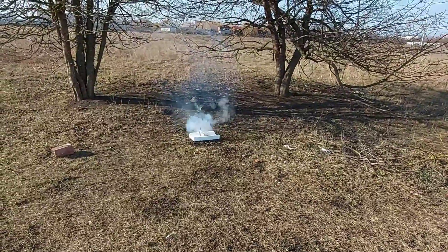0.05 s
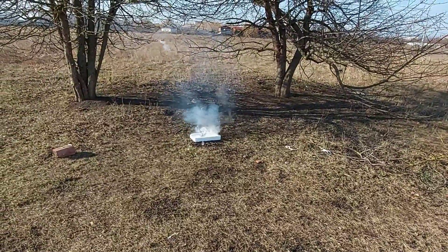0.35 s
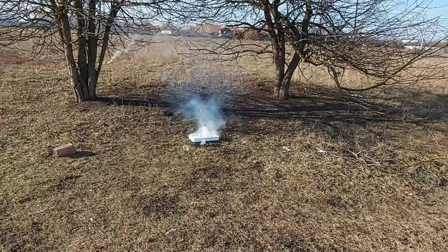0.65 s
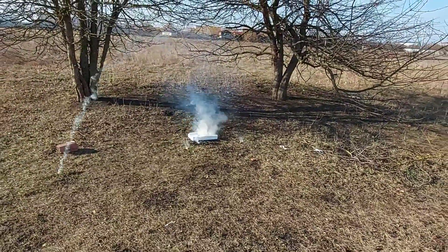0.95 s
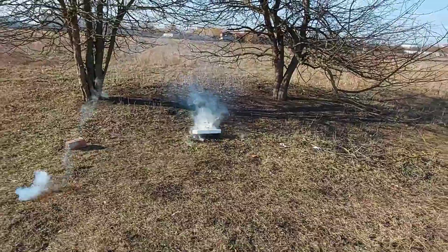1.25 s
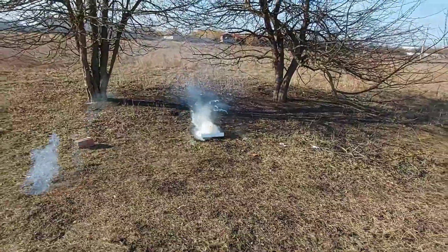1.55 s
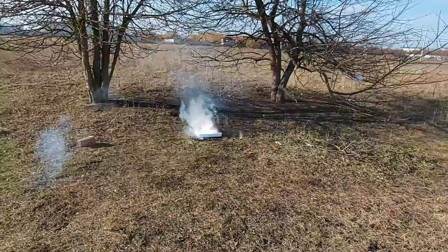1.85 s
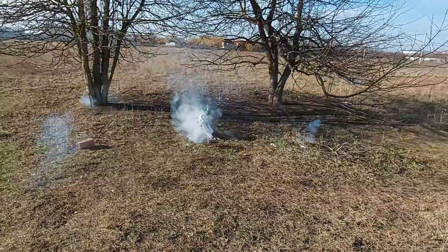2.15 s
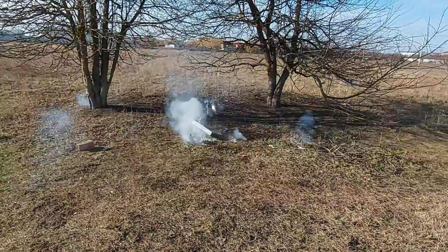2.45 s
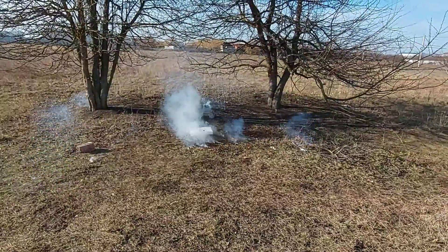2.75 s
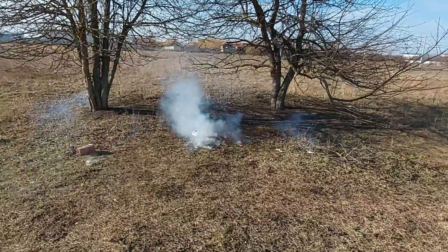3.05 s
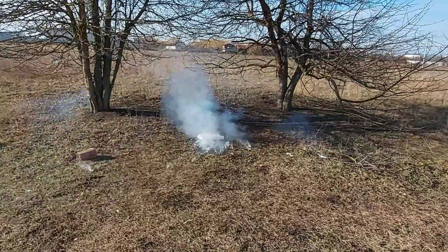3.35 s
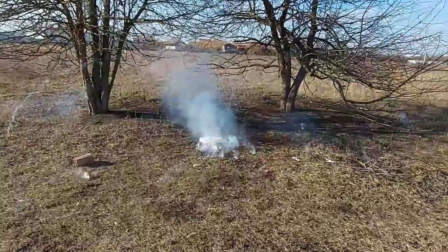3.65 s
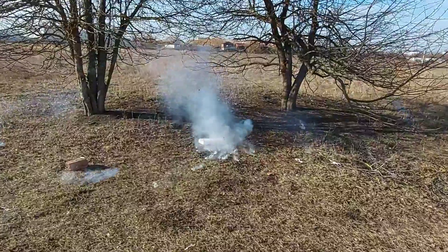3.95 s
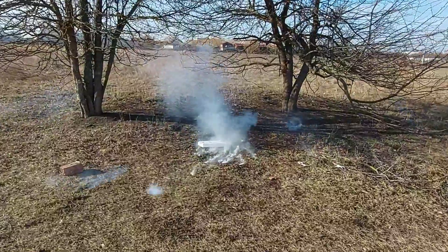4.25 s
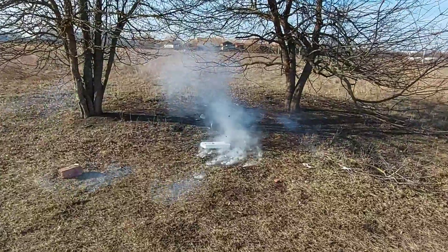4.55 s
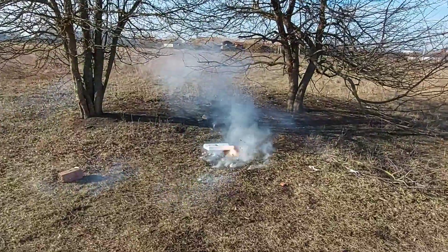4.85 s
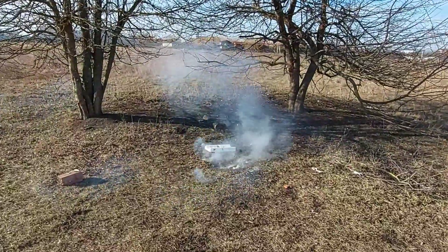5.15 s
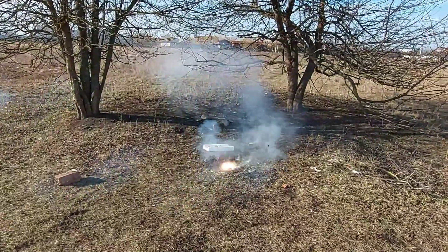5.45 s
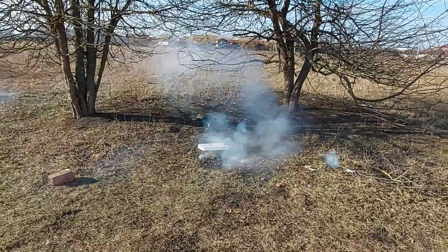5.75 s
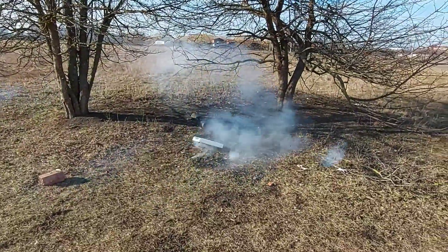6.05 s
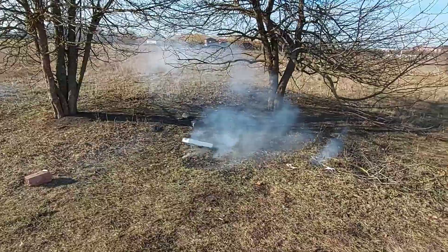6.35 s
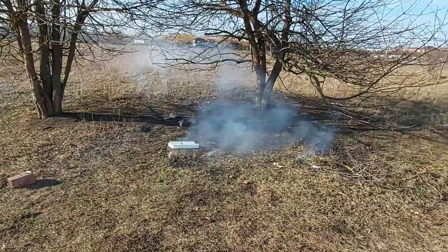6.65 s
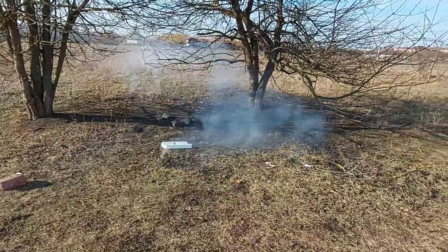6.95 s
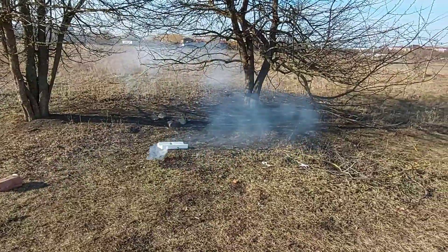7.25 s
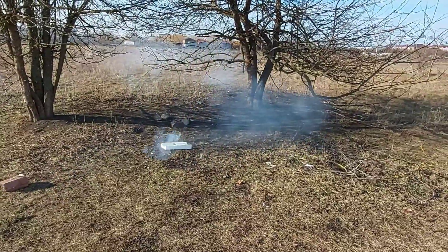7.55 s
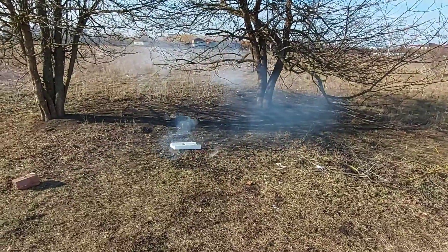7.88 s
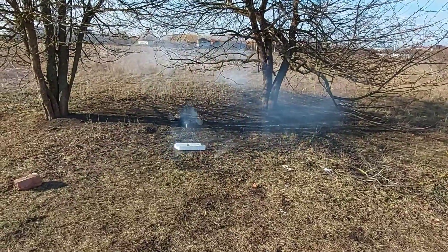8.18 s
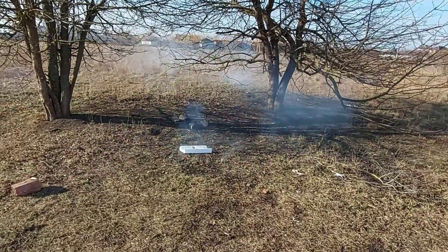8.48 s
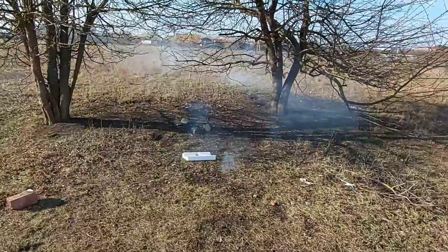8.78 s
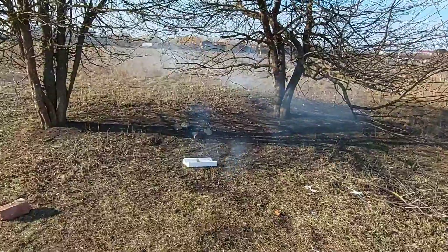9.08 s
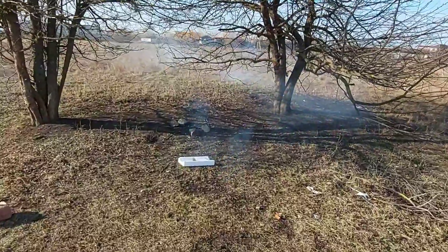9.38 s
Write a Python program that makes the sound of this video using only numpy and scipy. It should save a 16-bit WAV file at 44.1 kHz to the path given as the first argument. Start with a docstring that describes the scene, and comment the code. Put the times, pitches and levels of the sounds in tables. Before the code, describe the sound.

A bundle of firecrackers explodes outdoors in rapid, uneven cracks with faint echoes, ending with two single bangs over light wind.

```python
"""An open field: firecrackers go off a few metres away, one bang, ragged strings, then two late ones.
Each blast sprays back from grass and branches; distant trees and houses answer faintly.
Powder spits and fuses crackle over light wind; a faint drone swells far off near the end.
A limiter crushes each blast and recovers while the spray is still dying, so a bang has two humps."""
import sys
import numpy as np
from scipy import signal
from scipy.fft import rfft, irfft, next_fast_len
from scipy.io import wavfile
from scipy.ndimage import uniform_filter1d, minimum_filter1d, map_coordinates

SR = 44100
rng = np.random.default_rng(int(sys.argv[2]) if len(sys.argv) > 2 else 0)


def materialize(psi):
    """Save the field psi as 16-bit PCM at rate SR to the path in sys.argv[1].

    A 1-D psi becomes a single channel; in a 2-D psi each row is a channel.
    """
    bounded = np.clip(np.atleast_2d(psi).T, -1, 1)
    quanta = np.round(bounded * 32767).astype(np.int16)
    wavfile.write(sys.argv[1], SR, quanta)


N = 415422

# Wind puffs. Each row: peak time in seconds, half length in seconds, rumble rise in dB.
WIND_PUFFS = [(.1, 0.28, 7.5), (1.152, .2, 5), (7.62, 0.47, 6.5), (8.666, 0.29, 14), (9.357, 0.28, 6)]
# Noise spectra. Each row: frequency in Hz, relative density in dB.
RUMBLE_SPECTRUM = [(20, -23), (45, -2.5), (70, 7.5), (105, -11.5), (140, -1), (200, -19.5), (280, -18.5),
                   (450, -30.5), (900, -72.5)]
HUSH_SPECTRUM = [(100, -27.5), (280, 3), (420, -6.5), (540, -6), (750, -9), (1500, -15.5), (3000, -23),
                 (6000, -27.5), (15000, -33.5)]
GRASS_SPECTRUM = [(2500, -20), (4400, 1), (7000, -10), (15000, -18)]
DRONE_SPECTRUM = [(250, -23.5), (460, -5.5), (540, 3.5), (630, -12.5), (1100, -8.5), (1700, -20.5),
                  (4000, -43.5)]
LAND_SPECTRUM = [(60, -5.5), (200, -5), (450, -3.5), (900, -18), (1800, -4.5), (3000, -16.5), (4500, -4),
                 (7000, -11.5), (15000, -21)]
SPIT_SPECTRUM = [(200, 4), (1800, 0), (7000, -9), (15000, -15)]
FUSE_SPECTRUM = [(1000, -19), (4500, 1), (15000, -4.5)]
FLARE_SPECTRUM = [(300, -2), (1500, -10), (7000, -21.5), (15000, -33.5)]
SPRAY_SPECTRUM = [(30, -18), (70, -9), (200, -11.5), (350, -6.5), (700, -1.5), (1000, -5), (1400, -3.5),
                  (2800, -8), (4800, -11.5), (7000, -16.5), (15000, -25)]
BLAST_SPECTRUM = [(30, -24), (120, -9.5), (350, 5.5), (700, -1.5), (1400, -1), (2800, -8.5), (4800, -13),
                  (7000, -19), (15000, -24)]
# The land's diffuse answer to a bang. Each row: delay in seconds, relative level in dB.
LAND_DECAY = [(.03, -4.5), (.07, -6), (.12, -3), (.25, -13.5), (.38, -14.5), (.55, -13), (.9, -25)]
# Far trees and houses. Each row: delay in seconds, relative level in dB, T60 in seconds, centre in Hz.
REFLECTORS = [(0.094, 1.5, 0.011, 2650), (0.1219, 2, 0.24, 2064), (.197, -1, 0.16, 1910),
              (.29, -12, 0.33, 1800), (.425, -9, 0.85, 649)]
# Echo colour. Each row: multiple of the centre frequency, relative density in dB.
ECHO_BAND = [(.2, -14), (.45, -8), (.7, 0), (1, -1), (2.1, -8), (3.4, -17), (7, -27), (20, -55)]
# Spits and falling scraps. Each row: start in seconds, relative level in dB.
SPIT_EVENTS = [(0.388, -40), (1.0084, -58), (1.1394, -58), (2.537, -25), (3.3368, -34), (4.0124, -41),
               (6.6392, -42), (8.6419, -39.5)]
# Firecrackers. Each row: start in seconds, relative power in dB, thump in dB, midrange scoop in dB.
CRACKERS = [(0.0469, 7.5, -14.5, 9.5), (1.3032, 0, -3, 0), (1.343, 5, -1, 5), (1.6493, -7.5, 1.5, 2),
            (1.6919, 1, -9, 6.5), (1.9385, -2, 1.5, 2), (1.9765, 0, -5.5, 3), (2.0212, -1.5, -3, 4),
            (2.0906, -1.5, 2, 5.5), (2.1064, -0.5, -10, -5.5), (2.1251, 0.5, 5.5, 2), (2.1419, -2.5, -7, 0),
            (2.155, 2, -1.5, 6), (2.2018, 3, -8.5, 1), (2.2886, -4, -1.5, -1.5), (2.393, -1, 6.5, 0.5),
            (2.5659, 2.5, -0.5, 6), (2.584, -12.5, 2.5, 0), (2.609, -1.5, 2.5, 1), (2.6305, 1, 2, 1.5),
            (2.7369, 3, 3.5, 0), (2.9097, 0, 1.5, 0), (2.9597, 5.5, -4, 1), (3.0809, -19.5, -2.5, 4.5),
            (3.2103, 1, -5.5, 2.5), (3.246, 3.5, 2.5, 4.5), (3.6697, -7.5, 3, 5), (3.7363, 2.5, -2, -4),
            (3.7535, -4, -2, 0), (3.7865, 0.5, -9, -1), (3.8289, 2.5, 1, 0), (3.839, -3, -15, -2.5),
            (3.8734, -2.5, 0.5, 5), (3.9461, -7.5, 3.5, 3.5), (4.1245, -5, 0.5, -1), (4.344, -1.5, 4.5, 3),
            (4.408, -1.5, -0.5, 1), (4.6369, -1, 2, 1), (4.6661, -6.5, -6.5, -1), (4.7854, -1, 6, -3.5),
            (4.8163, -2.5, 4.5, -3), (4.8545, -1, -1, 0), (4.9605, -3.5, 0, 2), (5.0048, -4, -1.5, -0.5),
            (5.108, -2, 5, 0.5), (5.134, -3, -13, -2.5), (5.1635, -3, -3.5, -1.5), (5.1928, -4, 1, -2),
            (5.2055, 0, -3, 1), (5.363, 1.5, -3.5, -0.5), (5.3901, -2, 4.5, 3), (5.5557, -1.5, 1.5, -3.5),
            (5.5997, 1.5, -9, 1), (5.6221, -3, -5.5, -3), (5.666, -0.5, -10, -2),
            (5.7024, -11.5, 12.5, 1.5), (5.749, 3, 5, 3), (6.0995, -4, 1.5, 0.5), (6.1567, -3, -6, -3.5),
            (6.3337, 1, 2, -2.5), (7.3005, 0.5, -3, 6), (8.7788, 1, 4.5, -2.5)]
# Stereo likeness of noise. Each row: frequency in Hz, left-right correlation.
STEREO_LIKENESS = [(60, 0.62), (250, .8), (600, 0.58), (1200, 0.078), (3000, 0.07), (10000, 0)]
# Microphone response with its port notch. Each row: frequency in Hz, gain in dB.
MIC_RESPONSE = [(7600, 1), (8500, -8), (9500, -10.5), (10500, -3.5), (11800, 1.5), (15200, 1),
                (16000, -11.5), (16600, -34)]


def amp(db):
    """Decibels to gain."""
    return 10 ** (np.asarray(db) / 20)


def unit(x):
    """x at rms 1."""
    return x / np.sqrt(np.mean(x ** 2) + 1e-20)


def along(points, hz):
    """(Hz, value) points read on a log axis."""
    knot_hz, values = np.transpose(points)
    return np.interp(np.log(hz + 1), np.log(knot_hz + 1), values)


def filtered(x, response):
    """x through a frequency response."""
    size = x.shape[-1]
    padded = next_fast_len(size + SR // 10)
    return irfft(rfft(x, padded) * response(np.fft.rfftfreq(padded, 1 / SR)), padded)[..., :size]


def split(x, edge_hz):
    """Low and high bands of x."""
    low = filtered(x, lambda hz: 1 / (1 + (hz / edge_hz) ** 4))
    return low, x - low


def causal(gain_db):
    """Minimum-phase response: no ringing ahead of a blow."""
    cepstrum = irfft(np.log(amp(gain_db)))
    half = cepstrum.shape[-1] // 2
    cepstrum[..., 1:half] *= 2
    cepstrum[..., half + 1:] = 0
    return np.exp(rfft(cepstrum))


def noise(spectrum, size):
    """Stereo noise of rms 1, alike in the bass, unrelated in the treble."""
    def colour(hz):
        angle = np.arccos(np.clip(along(STEREO_LIKENESS, hz), -1, 1)) / 2
        return amp(along(spectrum, hz)) * np.array([np.cos(angle), np.sin(angle)])
    mid, side = filtered(rng.standard_normal((2, size)), colour)
    return unit(np.array([mid + side, mid - side]))


def wobble(rate_hz, size):
    """Smooth random curve, rate_hz knots a second."""
    knots = rng.standard_normal(int(size * rate_hz / SR) + 4)
    return map_coordinates(knots, [np.arange(size) * rate_hz / SR])


def patchy(x, depth_db):
    """x under random gain over time and frequency."""
    bins = signal.stft(x, nperseg=512)[2]
    field = uniform_filter1d(rng.standard_normal(bins.shape[1:]), size=4, axis=0)
    field = uniform_filter1d(field, size=7, axis=1)
    return signal.istft(bins * amp(depth_db * unit(field)), nperseg=512)[1][:, :N]


def add(track, start_s, sound):
    """Mix a sound into the track."""
    start = round(start_s * SR)
    first, last = max(start, 0), min(start + sound.shape[-1], N)
    track[..., first:last] += sound[..., first - start:last - start]


def breeze(rumble_db=-66, hush_db=-69.5, grass_db=-90):
    """Wind puffs rumble on the microphone, lift the hush of open country and stir dry grass."""
    t = np.arange(N) / SR
    gust_db = sum(db * np.exp(-((t - peak_s) / half_s) ** 2) for peak_s, half_s, db in WIND_PUFFS)
    rumble = amp(rumble_db + gust_db + 2.8 * wobble(9, N)) * noise(RUMBLE_SPECTRUM, N)
    hush = amp(hush_db + .23 * gust_db + .48 * wobble(2.2, N)) * noise(HUSH_SPECTRUM, N)
    grass = amp(grass_db + .37 * gust_db + 3 * wobble(7, N)) * noise(GRASS_SPECTRUM, N)
    return rumble + patchy(hush, depth_db=2.5) + grass


def drone(level_db=-72, peak_s=8.45, half_s=.4, waver_db=2):
    """A dull, wavering drone swells and fades far across the fields."""
    swell = np.exp(-((np.arange(N) / SR - peak_s) / half_s) ** 2)
    waver = amp(level_db + waver_db * wobble(6, N))
    return swell * waver * patchy(noise(DRONE_SPECTRUM, N), depth_db=2.5)


def far_echoes(land_db=-51, echo_db=-47, dull_hz=1300, dull_t60_s=1.3, flutter_db=2.4):
    """Land, trees and houses return every bang; long paths come back duller and softer."""
    t = np.arange(SR) / SR
    bang_power = np.zeros(N)
    for start_s, power_db, *_ in CRACKERS:
        add(bang_power, start_s, amp([power_db]) ** 2)

    def after_bangs(envelope):  # echoes add in power
        return np.sqrt(np.abs(signal.fftconvolve(bang_power, envelope ** 2)[:N]))

    low_decay = amp(np.interp(t, *np.transpose(LAND_DECAY))) * (t > LAND_DECAY[0][0])
    high_decay = low_decay * amp(1.5 - 60 * t / dull_t60_s)
    low, high = split(noise(LAND_SPECTRUM, N), dull_hz)
    out = amp(land_db) * (low * after_bangs(low_decay) + high * after_bangs(high_decay))
    for delay_s, db, t60_s, centre_hz in REFLECTORS:
        spectrum = [(multiple * centre_hz, band_db) for multiple, band_db in ECHO_BAND]
        age_s = np.maximum(t - delay_s, 0)
        envelope = (1 - np.exp(-age_s / (.026 * t60_s))) * amp(-60 * age_s / t60_s)
        out += amp(echo_db + db) * noise(spectrum, N) * after_bangs(envelope)
    return patchy(out * amp(flutter_db * wobble(130, N)), depth_db=2)


def spits(gain_db=-7, t60_s=.047):
    """Tiny dry snaps of powder and paper."""
    out, t = np.zeros((2, N)), np.arange(SR // 10) / SR
    for start_s, db in SPIT_EVENTS:
        add(out, start_s, amp(db + gain_db - 60 * t / t60_s) * noise(SPIT_SPECTRUM, len(t)))
    return out


def fuses(level_db=-77, sparks_per_s=22, t60_s=.023):
    """Smouldering fuses crackle faintly."""
    t = np.arange(SR // 10) / SR
    sparks = (rng.random(N) < sparks_per_s / SR) * rng.exponential(size=N)
    crackle = signal.fftconvolve(sparks, amp(-60 * t / t60_s))[:N]
    return amp(level_db) * crackle * noise(FUSE_SPECTRUM, N)


def flare(start_s=1.2862, level_db=-24, puff_hz=170, decay_s=.007, hiss_db=-17):
    """Loose powder catches with a soft puff just before the string goes off."""
    out, t = np.zeros((2, N)), np.arange(SR // 20) / SR
    puff = np.sin(2 * np.pi * puff_hz * t) + amp(hiss_db) * noise(FLARE_SPECTRUM, len(t))
    add(out, start_s, amp(level_db) * puff * np.exp(-t / decay_s))
    return out


def falling_ring(level_db=-32.5, start_hz=620, end_hz=250, glide_s=.05, t60_s=.42):
    """A rough, hollow ring trails the opening bang, sinking in pitch."""
    out, t = np.zeros((2, N)), np.arange(SR // 2) / SR
    pitch_hz = end_hz + (start_hz - end_hz) * np.exp(-t / glide_s)
    voices_hz = pitch_hz * np.exp(.24 * np.array([wobble(90, len(t)) for _ in range(8)]))
    voices = np.sin(2 * np.pi * np.cumsum(voices_hz, axis=1) / SR)
    ring = unit(np.array([voices[:-1].sum(0), voices[1:].sum(0)]))
    add(out, CRACKERS[0][0], ring * amp(level_db - 60 * t / t60_s))
    return out


def hollows_db(hz, depth_db=2.6, stereo_spread=.16):
    """Interfering paths make random peaks and dips, partly different per side; long waves escape."""
    position = 4 * np.log2(1 + hz / 2000)
    knots = rng.standard_normal((3, int(position[-1]) + 2))
    both, left, right = [np.interp(position, np.arange(len(row)), row) for row in knots]
    return depth_db * (both + stereo_spread * np.array([left, right])) * np.minimum(position / 2, 1)


def spray(t, rise_s=.004, twig_t60_s=.088, ground_t60_s=.076, ground_db=4, clump_db=2.6):
    """Grass and twigs reflect in clumps; trunks add a stronger return, the ground a brief rumble."""
    trunk_delay_s, trunk_width_s = rng.normal(.017, .002), .001
    trunk = amp(rng.normal(-3, 3.8)) * np.exp(-((t - trunk_delay_s) / trunk_width_s) ** 2)
    grains = unit(noise(SPRAY_SPECTRUM, len(t)) * amp(.5 * wobble(900, len(t))))
    ground, twigs = split(grains, edge_hz=650)
    unevenness = np.minimum(1, 2 * np.exp(-t / .022))  # early reflections are few, later ones merge
    clumps = amp(clump_db * wobble(260, len(t)) * unevenness)
    tail = twigs * amp(-60 * t / twig_t60_s) + ground * amp(ground_db - 60 * t / ground_t60_s)
    return (1 - np.exp(-t / rise_s)) * (1 + trunk) * clumps * tail


def burst(t, crack_hold_s=.0023, fall_db_per_hold=13, bark_peak_s=.0027, bark_db=-2):
    """The case bursts: a ragged crack, a hollow bark just behind it."""
    bark, crack = split(noise(BLAST_SPECTRUM, len(t)), edge_hz=800)
    crack_envelope = amp(-fall_db_per_hold * np.maximum(t / crack_hold_s - 1, 0))
    bark_envelope = (t / bark_peak_s * np.exp(1 - t / bark_peak_s)) ** 2
    return crack * crack_envelope + amp(bark_db) * bark * bark_envelope


def gas_push(t, median_hz=120, delay_s=.0016, decay_s=.0029, level_db=-3, phase_spread_rad=.85):
    """A push of gas and its suction: one quickly damped swing."""
    age_s = np.maximum(t - delay_s, 0)
    swing_hz = median_hz * np.exp(rng.normal(0, .31))
    swing = np.sin(2 * np.pi * swing_hz * age_s + phase_spread_rad * rng.standard_normal((2, 1)))
    return amp(level_db) * swing * (1 - np.exp(-age_s * SR / 10)) * np.exp(-age_s / decay_s)


def coloured(x, scoop_db, bass_db):
    """x from barking to hollow: midrange scoop, bass shelf and random path interference."""
    tint = [(450, .4 * scoop_db), (2000, -.6 * scoop_db), (7000, 1.38 + .27 * scoop_db)]
    shelf_db = lambda hz: bass_db / (1 + (hz / 200) ** 2)
    return filtered(x, lambda hz: causal(along(tint, hz) + shelf_db(hz) + hollows_db(hz)))


def firecrackers(blast_db=19, spray_db=-3):
    """Each cracker: a direct blast and its spray. Blasts overload, so power shows mostly in the spray."""
    out, t = np.zeros((2, N)), np.arange(SR // 8) / SR
    for start_s, power_db, thump_db, scoop_db in CRACKERS:
        front = burst(t)
        thump = amp(thump_db) * gas_push(t)
        direct = coloured(front, scoop_db, bass_db=-6) + thump
        scattered = coloured(spray(t), scoop_db, bass_db=thump_db + 1)
        add(out, start_s, amp(blast_db + .97 * power_db) * direct + amp(spray_db + power_db) * scattered)
    return out


def scene():
    """Near bangs, their far answer and the field."""
    return flare() + firecrackers() + falling_ring() + far_echoes() + spits() + fuses() + breeze() + drone()


def limiter(x, ceiling=.74, release_db_per_s=1250, ahead_s=.0012):
    """Gain ducks just before each peak, then climbs back."""
    over_db = np.maximum(20 * np.log10(np.abs(x).max(axis=0) / ceiling + 1e-9), 0)
    climb_db = release_db_per_s * np.arange(N) / SR
    duck_db = np.maximum.accumulate(over_db + climb_db) - climb_db
    size = 2 * max(int(ahead_s * SR / 2), 1) + 1
    gain_db = minimum_filter1d(-duck_db, size, origin=-(size // 2))
    return x * amp(uniform_filter1d(gain_db, size, origin=size // 2))


def record(dry, overload_db=21, bass_cut_hz=36, top_hz=16650):
    """Soft microphone overload, port notch, limiter, band limits."""
    squashed = dry / np.sqrt(1 + (dry / amp(overload_db)) ** 2)
    notched = filtered(squashed, lambda hz: causal(along(MIC_RESPONSE, hz)))
    bass_cut = signal.butter(2, bass_cut_hz, "high", fs=SR, output="sos")
    lean = signal.sosfilt(bass_cut, limiter(notched))
    return filtered(lean, lambda hz: hz < top_hz)


dry = scene()
out = record(dry)
materialize(out)
```